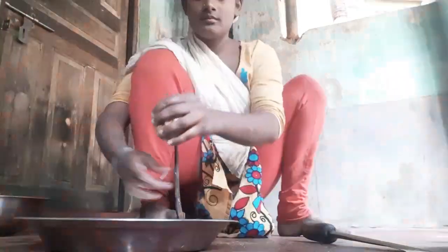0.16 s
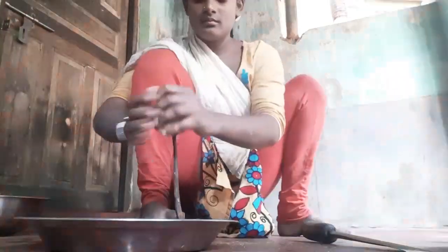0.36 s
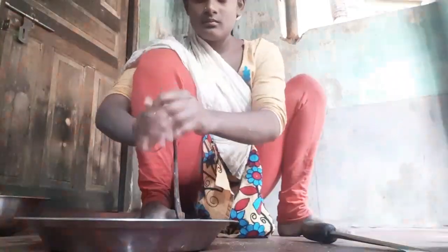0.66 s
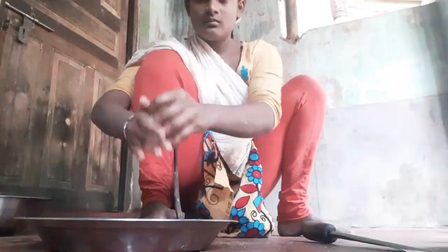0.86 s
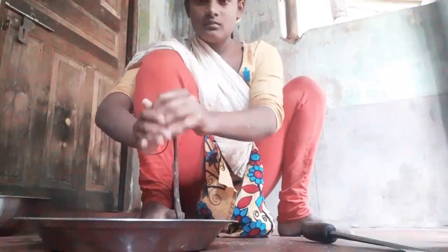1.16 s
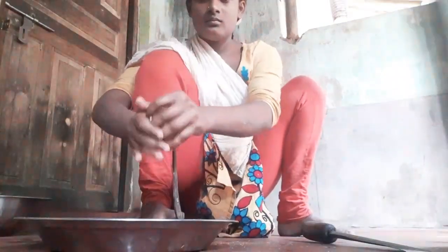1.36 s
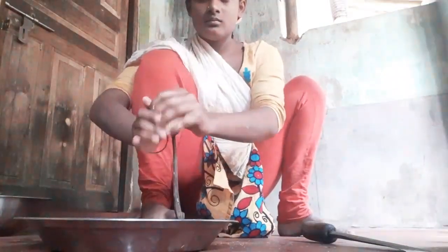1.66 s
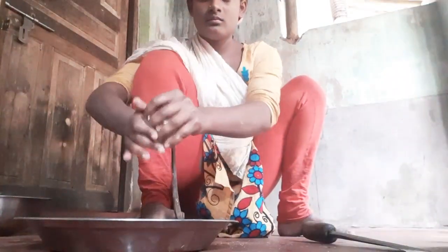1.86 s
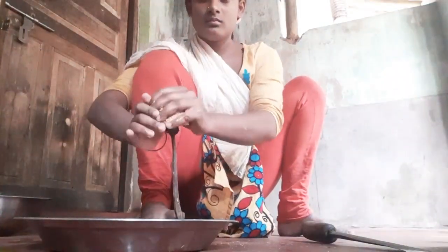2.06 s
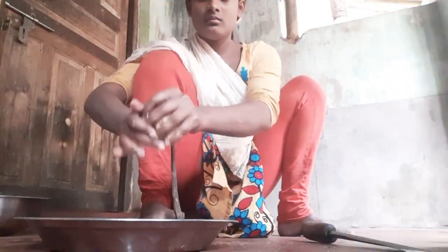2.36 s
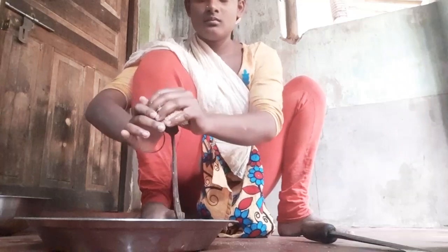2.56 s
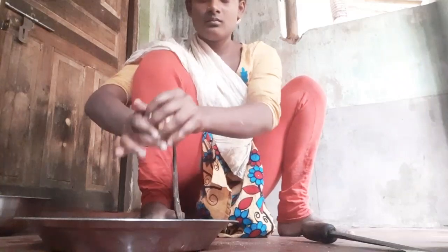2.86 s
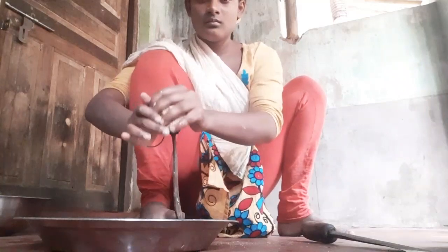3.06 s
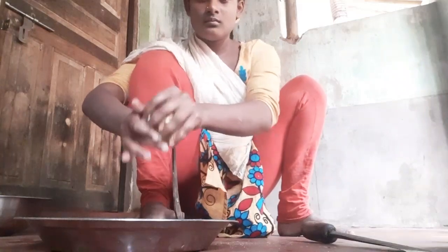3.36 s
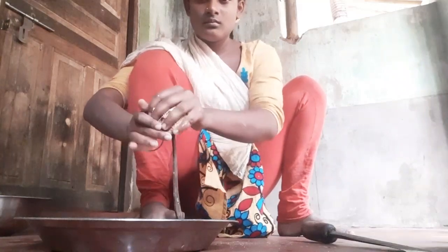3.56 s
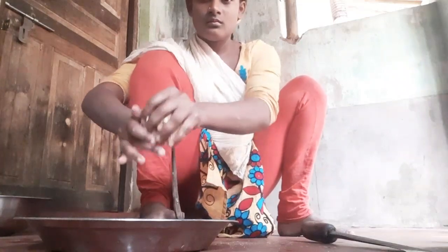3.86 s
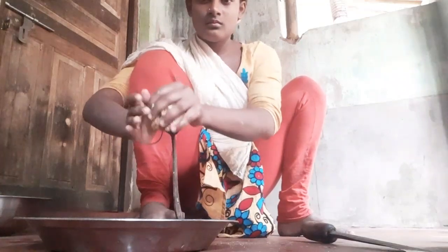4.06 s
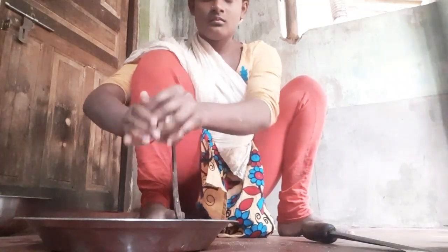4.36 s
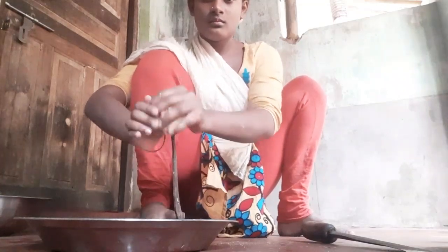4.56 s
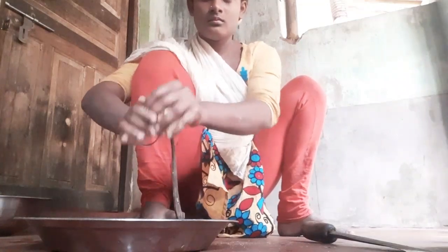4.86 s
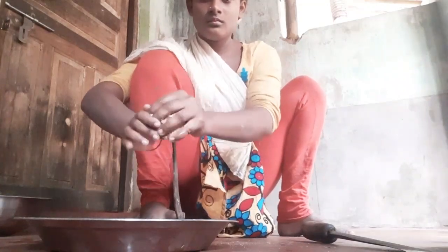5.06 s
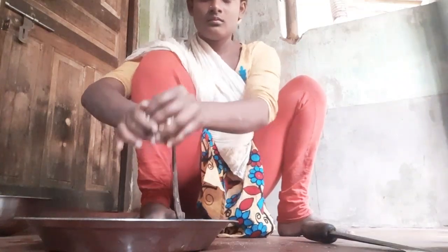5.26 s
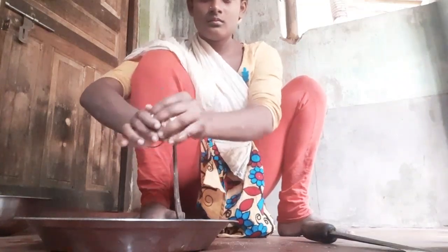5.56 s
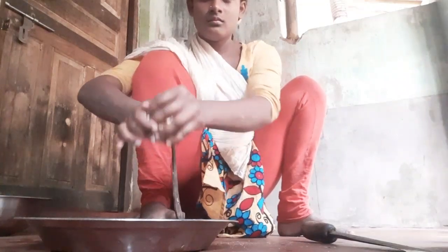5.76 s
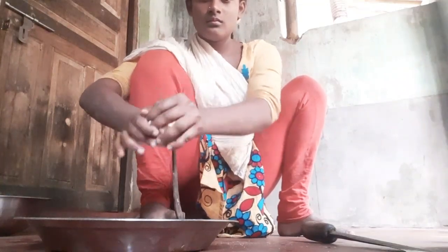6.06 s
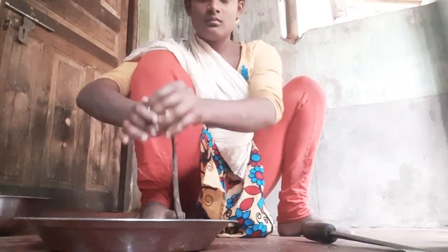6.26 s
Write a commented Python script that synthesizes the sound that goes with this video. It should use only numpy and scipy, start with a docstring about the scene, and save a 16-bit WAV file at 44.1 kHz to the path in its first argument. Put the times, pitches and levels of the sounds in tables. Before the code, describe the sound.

A small, hard-walled room with quiet low-pitched air, heard close in stereo. At 0.03 s a coconut shell clacks hard on an iron grater, with rumble, soft rustle and a low hum fading by 0.4 s. From about 0.8 s grating settles into a steady beat, one twist every half second until 6.1 s. Each twist is three quick rasps within some 0.12 s, the middle usually loudest: crackling fibres, gritty midrange scrape, bright hiss, a short metallic singing at the catch. Dull hollow knocks follow strokes, faint at first, firmer at 2.4, 3.8 and 4.8 s. Low hum swells around 2.4 s; a bangle jingles barely audibly near 2.7 s over a faint deep drone until 4 s. A light clack comes at 5.0 s. From 5.6 s rumble and hum swell again, and a brighter clack rings at 6.37 s.

```python
"""A small hard-walled room where half a coconut is grated on an upright iron grater, heard in stereo. Under
quiet room air, low rumble, hum and rustle of handling swell early on as a hard clack rings out. Then, about
twice a second, a twist drags the flesh over the teeth in three passes: snapping fibres are clicks that excite
resonances and hiss. Dull knocks join in, rung by short contacts; midway a bangle jingles faintly over a deep
drone. Towards the end the rumble and hum swell again and the last clacks ring."""
import sys
import numpy as np
from scipy import signal
from scipy.fft import rfft, irfft, next_fast_len
from scipy.io import wavfile

SR = 44100
rng = np.random.default_rng(int(sys.argv[2]) if len(sys.argv) > 2 else 0)


def unload_wav(signal):
    """Save mono or channel-first audio to the path in sys.argv[1] as 16-bit WAV at rate SR, clipped to [-1, 1]."""
    wavfile.write(
        sys.argv[1],
        SR,
        np.round(np.clip(np.atleast_2d(signal).T, -1, 1) * 32767).astype(np.int16),
    )


N = 282681
TIME = np.arange(N) / SR
FFT_SIZE = next_fast_len(N + SR // 4, real=True)
FFT_HZ = np.fft.rfftfreq(FFT_SIZE, 1 / SR)


def from_db(db):
    """Decibels to gain."""
    return np.exp(np.asarray(db) * np.log(10) / 20)


def rms_one(x):
    """Scale to unit power."""
    return x / np.sqrt(np.mean(x ** 2) + 1e-20)


def at_hz(points, hz):
    """Read a table on a log-frequency axis."""
    table_hz, values = np.array(points).T
    return np.interp(np.log(hz + 1e-6), np.log(table_hz), values)


def noise():
    """Two unrelated white noises: the shared and the diffuse part of a sound."""
    return rng.standard_normal((2, N))


def drift(rate):
    """Slow chance: random knots of spread 1, rate per second, joined by straight lines."""
    knots = rng.standard_normal(int(N / SR * rate) + 2)
    return np.interp(TIME * rate, np.arange(len(knots)), knots)


def colour(x, spectrum):
    """Give a white signal a smooth spectrum at equal power."""
    gain = rms_one(from_db(at_hz(spectrum, FFT_HZ)))
    return irfft(rfft(x, FFT_SIZE) * gain, FFT_SIZE)[..., :N]


def butter(x, hz, kind, order=2):
    """Causal low-, high- or band-pass."""
    return signal.sosfilt(signal.butter(order, hz, kind, fs=SR, output="sos"), x)


def resonate(x, modes):
    """Parallel two-pole resonances with alternating signs; a wider one dies sooner."""
    out = 0
    for k, (hz, width_hz, level_db) in enumerate(modes):
        r = np.exp(-np.pi * width_hz / SR)
        gain = (-1) ** k * from_db(level_db) * (1 - r * r) / 2
        poles = [1, -2 * r * np.cos(2 * np.pi * hz / SR), r * r]
        out = out + gain * signal.lfilter([1, 0, -1], poles, x + 1e-18)
    return out


def chime(x, modes):
    """A unit click sets each mode ringing as a dying sine, neighbours in opposite sense."""
    out = 0
    for k, (hz, level_db, t60_s) in enumerate(modes):
        r, w = from_db(-60 / (t60_s * SR)), 2 * np.pi * hz / SR
        ring = signal.lfilter([0, np.sin(w)], [1, -2 * r * np.cos(w), r * r], x + 1e-18)
        out = out + (-1) ** k * from_db(level_db) * ring
    return out


def octaves_off(hz, favoured_hz):
    """How far a mode lies from the pitch that the point of contact favours, up to an octave."""
    return min(abs(np.log2(hz / favoured_hz)), 1)


def contact(chatter_s, chatter_db):
    """Half a second holding a blow: one sharp touch, then a quickly dying chatter."""
    t = TIME[:SR // 2]
    decay = np.exp(-t / chatter_s) / np.sqrt(chatter_s * SR / 2)
    burst = from_db(chatter_db) * rng.standard_normal((2, len(t))) * decay
    burst[0, 0] += 1  # the touch is shared by both channels
    return burst


def add(track, s, sound):
    """Mix a short sound into a track at time s."""
    start = max(int(s * SR), 0)
    track[..., start:start + sound.shape[-1]] += sound[..., :track.shape[-1] - start]


def swell(s, rise_s, fall_s, level_db, rise_shape=2.15, fall_shape=1.82):
    """Power of a rounded swell that peaks at time s."""
    power = np.zeros(N)
    near = slice(*np.searchsorted(TIME, [s - 5 * rise_s, s + 6 * fall_s]))
    t = TIME[near] - s
    before, after = np.abs(t / rise_s) ** rise_shape, np.abs(t / fall_s) ** fall_shape
    power[near] = from_db(level_db) ** 2 * np.exp(-np.where(t < 0, before, after))
    return power


def spell(start_s, end_s, attack_s=0.12, release_s=0.032):
    """Gain that rises to 1 at the start, holds, and dies away after the end."""
    early, late = np.minimum(TIME - start_s, 0), np.maximum(TIME - end_s, 0)
    return np.exp(early / attack_s - late / release_s)


def room(x, t60, wet_db, delay_s=0.0031):
    """Dense reflections off close walls, dying exponentially."""
    t = TIME[:SR // 2]
    tail = rng.standard_normal((2, len(t))) * from_db(-60 * t / t60) * (t > delay_s)
    tail /= np.sqrt(np.sum(tail ** 2, axis=1, keepdims=True))
    return x + from_db(wet_db) * signal.fftconvolve(x, tail, axes=1)[:, :N]


# quiet air of the room, relative spectrum: pitch_hz, level_db
AIR_SPECTRUM = [(15, -51), (25, -38.5), (49, -9), (119, -10.5), (148, 8), (215, -20.5), (378, -17),
                (804, -12.5), (1850, -37), (2300, -31.5), (3530, -42.5), (7700, -40), (14300, -43.5),
                (15500, -71.5)]


def room_air(level_db=-55.5):
    """Steady coloured noise of the quiet room."""
    return from_db(level_db) * colour(noise(), AIR_SPECTRUM)


# low rumble, relative spectrum: pitch_hz, level_db
RUMBLE_SPECTRUM = [(10, -84.5), (30, -39), (45, -17.5), (75, -8), (100, 7), (125, 7), (160, 6.5), (195, -5),
                   (260, 0.5), (450, -51.5)]
# spells of handling noise, for rumble and rustle: start_s, end_s, rumble_db, rustle_db
HANDLING_SPELLS = [(-.05, 0.333, -39, -48.5), (4.748, 5.278, -56, -49.5), (5.575, 5.824, -35.5, -52),
                   (5.92, 6.45, -39.5, -50)]
# twists of the hands, three passes each, for rumble and scraping:
# middle_s, first_earlier_by_s, last_later_by_s, first_ease_in_s, first_db, middle_db, last_db, hiss_db
HAND_TWISTS = [(0.798, 0.058, 0.063, 0.019, -39.5, -38, -44.5, -4.5),
               (1.317, 0.068, 0.045, 0.028, -41.5, -37, -40.5, -5.5),
               (1.829, 0.051, 0.049, 0.034, -42, -35.5, -42, -5),
               (2.309, .063, 0.062, 0.016, -42.5, -31.5, -43, -3.5),
               (2.784, 0.048, 0.041, 0.029, -40, -37, -48, -1),
               (3.274, 0.09, .06, .024, -47.5, -35, -39, -2.5),
               (3.779, 0.055, 0.065, 0.01, -41.5, -35, -37.5, -2.5),
               (4.253, 0.056, .058, 0.033, -46.5, -35.5, -38, -3),
               (4.786, 0.092, 0.073, 0.037, -41, -35, -60, -6.5),
               (5.175, 0.059, 0.061, 0.031, -43, -34, -37.5, -2.5),
               (5.66, 0.079, 0.038, 0.039, -41.5, -37, -40, -3.5),
               (6.114, 0.075, 0.047, 0.0074, -39, -34, -39, -5)]


def rumble(rest_db=-59, twist_db=-49.5, twist_rise_s=0.053, twist_fall_s=0.19, lumpy_db=4.0):
    """The stand's lumpy low noise, faint all along and stronger under twists and handling."""
    twisting = sum(swell(s, twist_rise_s, twist_fall_s, twist_db) for s, *_ in HAND_TWISTS)
    handling = sum((from_db(db) * spell(start, end)) ** 2 for start, end, db, _ in HANDLING_SPELLS)
    lumps = rms_one(from_db(lumpy_db * np.tanh(drift(35))))
    gain = np.sqrt(from_db(rest_db) ** 2 + twisting + handling) * lumps
    return gain * colour(noise(), RUMBLE_SPECTRUM)


# soft rustle, relative spectrum: pitch_hz, level_db
RUSTLE_SPECTRUM = [(150, -23), (250, -7), (500, -8), (1000, -10.5), (2500, -26), (4000, -30.5),
                   (15000, -43.5)]


def rustle(rest_db=-68.5, uneven_db=-4.0):
    """Soft, uneven noise of handling, faint between the spells."""
    handling = sum((from_db(db) * spell(start, end)) ** 2 for start, end, _, db in HANDLING_SPELLS)
    gain = np.sqrt(from_db(rest_db) ** 2 + handling) * from_db(uneven_db * drift(40))
    return gain * colour(noise(), RUSTLE_SPECTRUM)


# hard clacks: start_s, level_db (relative), favoured_hz by the point of contact,
# contact_lowpass_hz, damping (by the hands, a factor)
CLACK_BLOWS = [(0.031, -2.5, 1400, 1980, 1.02), (4.988, -37, 1450, 2010, 1.5),
               (5.013, -14, 1910, 2000, 1.45), (5.926, -24, 940, 1520, 0.93), (6.3746, -6, 2670, 5100, 1.5)]
# modes of the iron grater under a hard blow: pitch_hz, level_db, t60_s (before hand damping)
IRON_MODES = [(458, -14.5, 0.12), (533, -20.5, 0.065), (667, -8.5, 0.029), (773, 0, 0.03),
              (872, -15, 0.095), (1154, -7.5, 0.1), (1250, -21.5, 0.14), (1390, -9, 0.044),
              (1643, -10.5, 0.1), (1730, -8, 0.071), (1820, -10, 0.0602), (2104, -6, .035),
              (2460, -5.5, 0.042), (2610, -13, 0.059), (2762, -17.5, 0.047), (3160, -26.5, 0.032),
              (3730, -9.5, 0.031), (4220, -23, 0.036)]


def clacks(ring_db=0, crack_db=5, focus_db=9, bounce_db=-9, bounce_s=0.016):
    """Hard clacks: a crack, a ring strongest in the modes near the favoured pitch, and one bounce."""
    out = np.zeros((2, N))
    for s, level_db, favoured_hz, contact_hz, damping in CLACK_BLOWS:
        modes = [(hz, mode_db - focus_db * octaves_off(hz, favoured_hz), t60_s / damping)
                 for hz, mode_db, t60_s in IRON_MODES]
        ring = chime(contact(chatter_s=0.002, chatter_db=-6), modes)
        bounce = chime(contact(chatter_s=0.0079, chatter_db=-1.5), modes)
        add(ring, bounce_s, from_db(bounce_db) * bounce)
        crack = contact(chatter_s=0.025, chatter_db=14.0)
        crack = butter(butter(crack, 230, "high"), 2000, "low")
        sound = from_db(ring_db) * ring + from_db(crack_db) * crack
        add(out, s, from_db(level_db) * butter(sound, contact_hz, "low", order=1))
    return room(butter(out, 5300, "low", order=8), t60=0.2, wet_db=-24.5)


# swells of a low hum: peak_s, rise_s, fall_s, level_db (before throbbing), pitch_hz (before wavering)
HUMS = [(0.229, 0.097, 0.046, -36.5, 116.2), (2.37, 0.1, 0.15, -38, 155.5),
        (3.59, 0.063, 0.23, -47.5, 155.5), (5.76, 0.16, 0.14, -35.5, 154.9),
        (6.12, 0.076, 0.092, -39.5, 124.6)]


def hum(waver_hz=2.2, throb_share=0.38, throb_rate=30):
    """Low sines swell and fade, wavering in pitch and throbbing unevenly."""
    wander = waver_hz * drift(5.3)
    tone = 0
    for s, rise_s, fall_s, level_db, pitch_hz in HUMS:
        phase = 2 * np.pi * np.cumsum(pitch_hz + wander) / SR
        tone = tone + np.sqrt(2 * swell(s, rise_s, fall_s, level_db)) * np.sin(phase)
    throb = 1 + throb_share * np.tanh(drift(throb_rate))
    return tone * throb * [[1], [0]]  # shared part only


# light brushes while the shell is repositioned: peak_s, rise_s, fall_s, rasp_db, hiss_db (relative to rasp)
LIGHT_BRUSHES = [(0.448, 0.019, 0.037, -57.5, -17), (3.128, 0.019, 0.022, -55.5, -12),
                 (3.597, 0.0056, 0.015, -55, -7), (4.97, 0.049, 0.24, -72, 11.5),
                 (5.475, 0.0074, 0.0094, -51.5, -10), (5.785, 0.029, 0.011, -58.5, -6.5),
                 (6.009, 0.0024, 0.01, -50, -2)]
# the three passes; each is duller than the one before (hiss relative to the rasp)
FIRST_FALL_S, FIRST_HISS_DB = 0.011, -5.5
MIDDLE_RISE_S, MIDDLE_FALL_S, MIDDLE_HISS_DB = 0.011, 0.0097, -11.5
LAST_RISE_S, LAST_FALL_S, LAST_HISS_DB = 0.0096, 0.014, -14.5
# the blade sings ahead of the first pass by a multiple of its easing-in; level relative to that pass
SING_LEAD_SHARE, SING_RISE_S, SING_FALL_S, SING_DB = 1.0, 0.013, 0.016, -5


def pressure():
    """Power of rasp and hiss through all passes, and of the blade's singing as each twist catches."""
    passes, first_touch = list(LIGHT_BRUSHES), 0
    for s, lead_s, lag_s, ease_s, first_db, middle_db, last_db, hiss_db in HAND_TWISTS:
        passes += [(s - lead_s, ease_s, FIRST_FALL_S, first_db, hiss_db + FIRST_HISS_DB),
                   (s, MIDDLE_RISE_S, MIDDLE_FALL_S, middle_db, hiss_db + MIDDLE_HISS_DB),
                   (s + lag_s, LAST_RISE_S, LAST_FALL_S, last_db, hiss_db + LAST_HISS_DB)]
        sing_s = s - lead_s - SING_LEAD_SHARE * ease_s
        first_touch = first_touch + swell(sing_s, SING_RISE_S, SING_FALL_S, first_db + SING_DB)
    force = sum(swell(s, rise, fall, db) for s, rise, fall, db, _ in passes)
    bite = sum(swell(s, rise, fall, db + hiss_db) for s, rise, fall, db, hiss_db in passes)
    return force, bite, first_touch


def tearing(per_s, spread_db, smooth_db):
    """Fibres snap on the teeth as dense clicks of uneven size over smooth friction."""
    sizes = from_db(spread_db * np.minimum(rng.exponential(1, N), 3))
    clicks = sizes * (rng.random(N) < per_s / SR)
    return rms_one(rms_one(clicks * noise()) + from_db(smooth_db) * noise())


def patchy(x, patch_db, count=14):
    """The treble of the tearing shifts from band to band as different teeth bite."""
    edges = np.geomspace(2500, 16500, count + 1)
    # neighbouring bands snap together but with unrelated signs
    sources = x * rng.choice([-1, 1], (2, N))
    bands = [butter(sources[k % 2], band, "band") for k, band in enumerate(zip(edges, edges[1:]))]
    return rms_one(sum(band * from_db(patch_db * drift(45)) for band in bands))


# resonances of shell and blade, for scraping and knocks: pitch_hz, width_hz (before hand damping), level_db
BODY_MODES = [(658, 197, 5), (898, 49, 6), (1165, 28.6, 13.5), (1393, 31, 10.5), (1630, 41, 0.5),
              (1777, 32, 6), (2135, 110, 9), (2350, 83, 10), (2664, 31, 4.5), (2880, 49, -1),
              (3776, 200, -2), (4276, 330, -16.5)]
# the blade sings when the flesh first catches it: pitch_hz, width_hz, level_db
BLADE_MODES = [(2240, 87, 3), (2360, 37, 0.5), (2586, 85, -6.5)]
# rasp of the teeth, relative spectrum: pitch_hz, level_db
RASP_SPECTRUM = [(120, -3.5), (250, 9), (450, 3), (900, -7), (1400, 5.5), (1900, -4), (2500, 3.5),
                 (3000, -12.5), (3500, -112.5), (6000, -145)]
# hiss of the snapping fibres, relative spectrum: pitch_hz, level_db
HISS_SPECTRUM = [(2000, -61), (3300, -22), (4000, -4), (5000, 10), (6400, 9), (7700, 13), (9000, -6),
                 (12000, 8), (14000, -2), (15500, -3)]


def scraping(ring_db=-3.0, rasp_db=-2.5, hiss_db=-2.5, catch_db=1.5, wander_db=11.0):
    """The snapping fibres rasp and hiss, and set shell and blade ringing."""
    force, bite, first_touch = pressure()
    # teeth catch and let go a few hundred times a second
    catches = from_db(catch_db * drift(250))
    snaps = rms_one(tearing(per_s=3100, spread_db=2.5, smooth_db=-3.5) * catches)
    drive = snaps * np.sqrt(force)
    # the moving point of contact favours now one resonance, now another
    ring = sum(resonate(drive, [mode]) * from_db(wander_db * np.tanh(drift(22))) for mode in BODY_MODES)
    ring = rms_one(ring) * np.std(drive)
    caught = snaps * np.sqrt(first_touch)
    sing = rms_one(resonate(caught, BLADE_MODES)) * np.std(caught)
    hiss = colour(patchy(snaps, patch_db=6.0) * np.sqrt(bite), HISS_SPECTRUM)
    rasp = colour(drive, RASP_SPECTRUM)
    close = from_db(ring_db) * ring + sing + from_db(rasp_db) * rasp + from_db(hiss_db) * hiss
    return room(close, t60=0.24, wet_db=-6)


# dull knocks of shell on grater: start_s, level_db (relative), brightness_db, favoured_hz by the contact point
KNOCK_BLOWS = [(0.93, -29, -8.5, 480), (1.433, -40, -17, 416), (1.95, -33.5, -9, 435),
               (2.424, -16, -8, 830), (2.919, -32, -24, 455), (3.431, -32.5, -12, 470),
               (3.829, -13.5, -3.5, 420), (3.908, -21, -8, 302), (4.398, -27.5, -9, 455),
               (4.539, -40.5, -20, 444), (4.77, -15.5, -25, 520), (4.876, -24.5, -6, 550),
               (5.176, -19.5, -15, 280), (5.316, -24.5, -13, 378), (5.787, -30.5, -30, 496),
               (6.036, -26.5, -24, 570), (6.244, -27.5, -8.5, 520)]
# low resonances of the stand and the hollow shell: pitch_hz, width_hz, level_db
STAND_MODES = [(283, 12, 9), (329.2, 40, 11), (433, 28, 11.5), (516, 260, -1.5), (680, 120, 6),
               (810, 33, 3.5), (896, 68, -2)]


def knocks(thud_db=29.5, ring_db=20, punch_db=28, rattle_db=21, hand_damping=1.2, focus_db=6,
           firm_db=-14, soft_share=0.51):
    """Padded blows: punch and rattle, low resonances, and a shell-and-blade ring damped by the hands."""
    out = np.zeros((2, N))
    damped = [(hz, width_hz * hand_damping, db) for hz, width_hz, db in BODY_MODES]
    for s, level_db, bright_db, favoured_hz in KNOCK_BLOWS:
        blow = contact(chatter_s=0.018, chatter_db=-3.5)
        focused = [(hz, width_hz, mode_db - focus_db * octaves_off(hz, favoured_hz))
                   for hz, width_hz, mode_db in STAND_MODES]
        thud = resonate(blow, focused)
        # firm blows punch, light ones mostly rattle
        soften_db = soft_share * min(level_db - firm_db, 0)
        punch = from_db(punch_db + soften_db) * contact(chatter_s=0.0016, chatter_db=-39.0)
        rattle = from_db(rattle_db) * contact(chatter_s=0.025, chatter_db=6.0)
        dull = butter(butter(punch + rattle, 790, "low", order=5), 201, "high", order=3)
        ring = butter(resonate(blow, damped), 1880, "low")
        sound = from_db(thud_db) * thud + dull + from_db(ring_db + bright_db) * ring
        add(out, s, from_db(level_db) * sound)
    return room(out, t60=0.19, wet_db=-7.5)


# light touches of a bangle: start_s, level_db (relative)
BANGLE_TOUCHES = [(2.52, -89), (2.631, -80.5), (2.722, -72), (2.8, -86)]
# modes of the thin metal hoop: pitch_hz, level_db, t60_s
BANGLE_MODES = [(4730, 7, 0.54), (7050, 6, 0.33), (7400, 7, 0.35), (8280, 8.5, 0.32), (10800, 3, 0.39)]


def bangle(flutter_db=4.0, ring_db=-4):
    """Light touches ring a thin metal hoop, which flutters as the wrist turns."""
    touches = np.zeros((2, N))
    for s, level_db in BANGLE_TOUCHES:
        add(touches, s, from_db(level_db) * contact(chatter_s=0.027, chatter_db=12.0))
    return sum(chime(touches, [mode]) * from_db(ring_db + flutter_db * drift(90)) for mode in BANGLE_MODES)


def deep_drone(start_s=2.53, end_s=4, level_db=-62.5, pitch_hz=45, width_hz=14):
    """A spell of very deep drone: noise through one narrow resonance."""
    drone = rms_one(resonate(noise(), [(pitch_hz, width_hz, 0)]))
    return from_db(level_db) * spell(start_s, end_s) * drone


# left-right likeness: pitch_hz, likeness (1 alike, 0 unrelated; below 0 counts as 0)
STEREO_LIKENESS = [(50, 0.76), (400, 0.88), (1000, -0.31), (2300, 0), (4500, 0.19), (12000, -0.11)]
# stereo balance: pitch_hz, left_minus_right_db
STEREO_BALANCE = [(40, -9), (140, 8.5), (300, 0), (700, 1), (1300, 3), (2400, 2.5), (4500, 0),
                  (12000, -4.5)]


def microphones(pair, left_lag_s=0.00007):
    """Shared and diffuse parts to two microphones, balanced by pitch; the left hears slightly late."""
    alike = np.clip(at_hz(STEREO_LIKENESS, FFT_HZ), 0, 0.99)
    tilt = from_db(at_hz(STEREO_BALANCE, FFT_HZ) / 2)
    mid, side = rfft(pair, FFT_SIZE) * np.sqrt([(1 + alike) / 2, (1 - alike) / 2])
    left = (mid + side) * tilt * np.exp(-2j * np.pi * FFT_HZ * left_lag_s)
    right = (mid - side) / tilt
    return irfft([left, right], FFT_SIZE)[:, :N]


def scene():
    """Grating, blows and handling over the quiet of the room."""
    background = room_air() + rumble() + rustle()
    return microphones(background + clacks() + hum() + scraping() + knocks() + bangle() + deep_drone())


def record(dry, cutoff_hz=15400):
    """The top is cut steeply."""
    return signal.sosfilt(signal.ellip(12, 0.1, 90, cutoff_hz, fs=SR, output="sos"), dry)


dry = scene()
out = record(dry)
unload_wav(out)
```